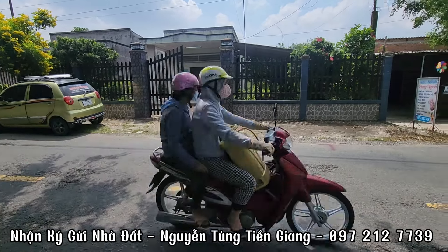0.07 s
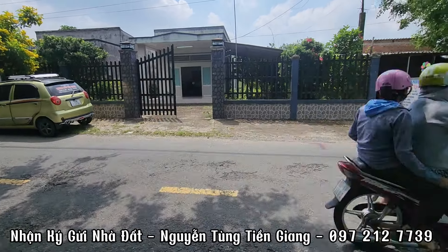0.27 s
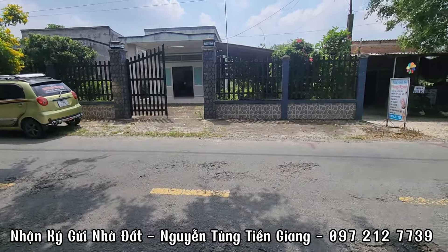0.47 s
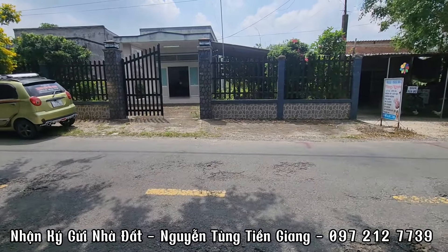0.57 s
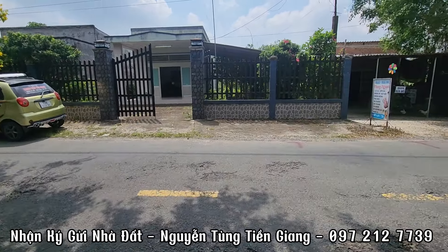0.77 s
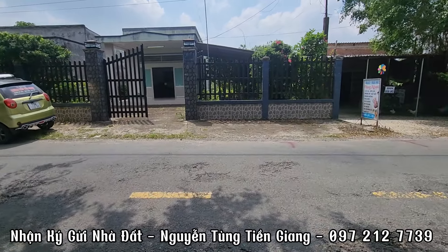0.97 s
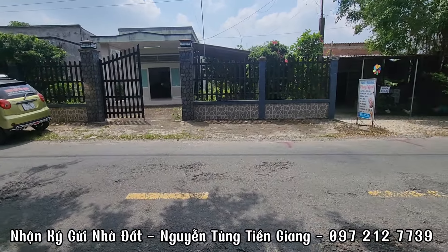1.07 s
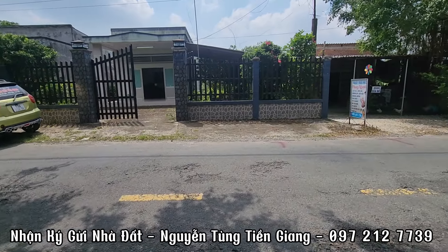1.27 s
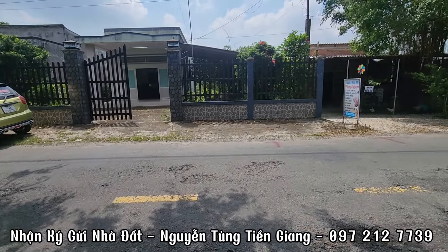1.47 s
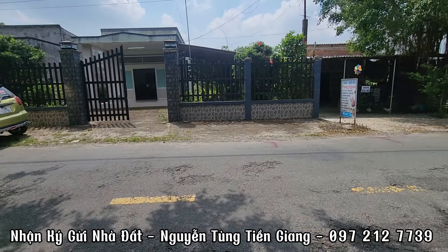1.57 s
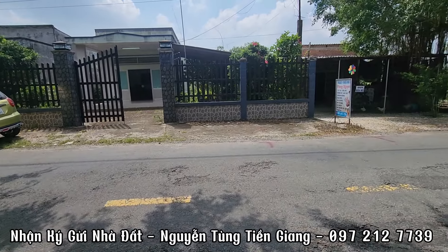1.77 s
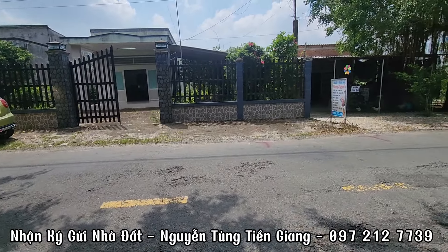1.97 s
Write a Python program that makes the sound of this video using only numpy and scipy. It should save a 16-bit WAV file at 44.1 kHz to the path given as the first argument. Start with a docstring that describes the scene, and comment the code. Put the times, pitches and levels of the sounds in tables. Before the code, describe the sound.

A small single-cylinder motorbike putters past close on a road, then rides away to the right

```python
"""Beside a road, a small single-cylinder motorbike passes close from the front to the right and rides away.
Each firing rings decaying resonances of silencer and pipe over bursts of gas rumble, with a nasal rasp.
Short bursts of bright noise are gas spitting from the tail; noise bands make tyre roar and chain hiss.
A pair of microphones hears the right side earlier and brighter."""
import sys
import numpy as np
from scipy import signal
from scipy.fft import rfft, irfft
from scipy.io import wavfile
from scipy.ndimage import map_coordinates

SR = 44100
rng = np.random.default_rng(int(sys.argv[2]) if len(sys.argv) > 2 else 0)


def gain_from_decibels(decibels):
    """Convert decibel values to linear amplitude factors."""
    exponent = np.asarray(decibels, float) / 20
    return 10 ** exponent


def digitize_waveform(pressure):
    """Quantize a signal to 16-bit integers and store it at the path in sys.argv[1].

    Rows of a 2-D input are taken as channels; values are limited to [-1, 1].
    """
    field = np.atleast_2d(pressure).T
    bounded = np.clip(field, -1, 1)
    quanta = np.round(bounded * 32767).astype(np.int16)
    wavfile.write(sys.argv[1], SR, quanta)


N = 88640  # length in samples


def rms_one(x):
    """Normalisation: equal mean power, scaling to unit rms."""
    return x / np.sqrt(np.mean(x ** 2) + 1e-20)


def in_time(rows, s=None):
    """Linear interpolation of a table's columns, at every sample or at times s."""
    t, *columns = np.transpose(rows)
    wanted = np.arange(N) / SR if s is None else s
    return [np.interp(wanted, t, column) for column in columns]


def at_hz(points, hz):
    """Interpolation of a spectrum on a logarithmic frequency axis."""
    point_hz, value = np.transpose(points)
    return np.interp(np.log(hz), np.log(point_hz), value)


def bin_hz():
    """Discrete Fourier transform: the frequencies of its bins."""
    return np.arange(N // 2 + 1) * SR / N


def drift(rate_hz):
    """Low-pass filtering: white noise through a double pole becomes a slow wander of unit rms."""
    step = 40  # samples between computed points
    pole = np.exp(-2 * np.pi * rate_hz * step / SR)
    white = rng.standard_normal(N // step + 2002)
    slow = signal.lfilter([1], [1, -2 * pole, pole * pole], white)[2000:]
    return np.interp(np.arange(N) / step, np.arange(len(slow)), rms_one(slow))


def colour(x, spectrum):
    """Linear filtering: multiplication in frequency shapes the spectrum of noise."""
    hz = np.maximum(bin_hz(), 1)
    return irfft(rfft(x) * gain_from_decibels(at_hz(spectrum, hz)), N)


def patchy_noise(spectrum, patchy_db, excite):
    """Amplitude modulation: half-octave bands of two unrelated noises flicker, partly together."""
    edges_hz = 25 * 2 ** np.arange(0, 9.6, .5)
    spec = rfft(rms_one(colour(excite, spectrum)))
    together = drift(11.3)
    hz, out = bin_hz(), 0
    for low, high in zip(edges_hz, edges_hz[1:]):
        band = irfft(spec * ((hz >= low) & (hz < high)), N)
        out = out + band * gain_from_decibels(patchy_db * (0.81 * together + drift(38.6)))
    return rms_one(out)


def firings():
    """Doppler effect: the firing rate sags as the bike turns from coming to going; timing is jittered."""
    # running count of firings: start_s, count
    firing_count = [(-.2, -5), (.0405, 1), (.1205, 3), (.2445, 6), (.538, 13), (.752, 18), (.926, 22),
                    (1.097, 26), (1.273, 30), (1.449, 34), (1.583, 37), (1.853, 43), (2.077, 48)]
    s, count = np.transpose(firing_count)
    chance = rng.standard_normal((53, 12))  # one row of chance for each firing
    timing_spread_s = .0006
    return np.interp(np.arange(-5, 48), count, s) + timing_spread_s * chance[:, 0], chance


def per_firing(s, shapes):
    """Superposition: one short shape is laid at each time and overlaps add."""
    pad, out = SR // 2, np.zeros(N + SR * 2)
    first = (s[:, None] * SR).astype(int) + pad
    np.add.at(out, first + np.arange(shapes.shape[1]), shapes)
    return out[pad:pad + N]


def resonance(t, hz, level_db, peak_s, swell, clock_s):
    """Damped resonance: a sine swells to its peak and dies, one row for each firing."""
    envelope = (t / peak_s * np.exp(1 - t / peak_s)) ** swell
    return gain_from_decibels(level_db)[:, None] * envelope * np.sin(2 * np.pi * hz[:, None] * clock_s)


def echoes(tone):
    """Reflection: road and walls return delayed, weaker copies."""
    # reflections: delay_s, level_db
    reflections = [(.007, -15), (0.017, -22)]
    out = tone
    for delay_s, db in reflections:
        lag = int(delay_s * SR)
        out = out + gain_from_decibels(db) * np.r_[np.zeros(lag), tone[:N - lag]]
    return out


def exhaust(s, chance):
    """Impulse excitation: each firing rings the pipes; gas noise bursts out and dies to a steady rumble."""
    # resonances and gas over time: start_s, boom_hz, boom_db, pipe_db, thud_db, gas_rumble_db
    exhaust_levels = [(0, 119, -11, -12.5, -3.5, -29), (.13, 122, -10, -11, -16, -50),
                      (.2, 105, -7.5, -19, -15, -30), (.25, 108.3, -9, -19, -3, -30.5),
                      (.3, 113.3, -6.5, -19, -16, -21.5), (.37, 114, -8.5, -16.5, -7.5, -21),
                      (.45, 117.3, -8, -19, -10, -21.5), (.55, 104, -8, -21, -7, -29),
                      (.7, 100, -11.5, -22, -9, -30.5), (.8, 101, -13.5, -28, -16.5, -33),
                      (1.1, 94, -15.5, -28, -14, -35), (1.4, 99, -19.5, -35, -24, -37.5),
                      (1.6, 95.8, -19, -36, -24.5, -39.5), (1.8, 102, -21.5, -37, -25, -38),
                      (1.9, 107, -19, -30, -25.5, -38), (2.01, 98, -23, -45, -25, -38.5)]
    # relative spectral density of the gas rumble: frequency_hz, level_db
    rumble_colour = [(30, -35), (60, -0.5), (130, 0.5), (200, -9), (305, -7), (385, -7), (600, -9),
                     (800, -18.5), (1000, -30), (1400, -32)]
    # nasal rasp of the engine's front side: start_s, level_db
    rasp_level = [(0, -32), (.15, -37.5), (.3, -34.5), (.45, -53), (.6, -61), (2.01, -64)]
    # relative spectral density of the rasp: frequency_hz, level_db
    rasp_colour = [(900, -18), (1200, -1.5), (1420, 4.5), (1700, -0.5), (2100, -27)]
    pitch_spread, strength_spread_db = .018, 1.1
    glide, glide_s = 0.29, 0.005  # the boom starts this share flat and rises to pitch
    gas_decay_s, gas_steady = 0.025, 0.76

    t = np.arange(SR // 8) / SR
    boom_hz, boom_db, pipe_db, thud_db, _ = in_time(exhaust_levels, s)
    gliding = t - glide * glide_s * (1 - np.exp(-t / glide_s))
    # pitch in Hz, level in dB, time of peak in s, sharpness of the swell, clock in s
    parts = [(boom_hz, boom_db, .0105, 1.2, gliding),
             (371.6, pipe_db, .0065, 1, t),  # pipe
             (440.6, pipe_db - 5, .0065, 1, t),  # upper pipe
             (165, thud_db, .0034, 2.6, t)]
    shapes = 0
    for k, (hz, db, peak_s, swell, clock_s) in enumerate(parts):
        varied_hz = hz * (1 + pitch_spread * chance[:, 1 + k])
        # one share of chance is common to all parts, the other is the part's own
        varied_db = db + strength_spread_db * (chance[:, 5] + chance[:, 6 + k])
        shapes = shapes + resonance(t, varied_hz, varied_db, peak_s, swell, clock_s)
    tone = echoes(per_firing(s, shapes))

    gate = gas_steady + per_firing(s, np.tile(np.exp(-t / gas_decay_s), (len(s), 1)))
    gas = patchy_noise(rumble_colour, patchy_db=1.5, excite=rng.standard_normal((2, N)))
    rasp = patchy_noise(rasp_colour, patchy_db=1.2, excite=rng.standard_normal((2, N)))
    noise = gain_from_decibels(in_time(exhaust_levels)[-1]) * gas + gain_from_decibels(in_time(rasp_level)[0]) * rasp
    return tone * [[1], [0]] + gate * noise  # the tone is wholly shared by both microphones


def spit(s, chance):
    """Jet noise: gas makes a short bright puff at each firing, with some extra spits and cracks added."""
    # puffs at the firings: start_s, level_db
    spit_level = [(0, -47), (.3, -44), (.5, -28), (.63, -22), (.76, -24.5), (.82, -35), (.97, -30.5),
                  (1.03, -26.5), (1.2, -42), (1.28, -40.5), (1.45, -31.5), (1.62, -41.5), (2.01, -80)]
    # extra spits and cracks: start_s, level_db
    extra_spits = [(0.395, -14), (0.584, -27), (.667, -27), (0.714, -25), (0.928, -31.5), (1.059, -32),
                   (1.097, -29), (1.143, -31), (1.188, -30.5), (1.318, -32.5), (1.381, -33), (1.402, -39),
                   (1.492, -46)]
    # relative spectral density: frequency_hz, level_db
    spit_colour = [(800, -4), (2000, 2), (3000, -6), (5000, 4), (7500, -2.5), (10000, -7.5), (13000, -9),
                   (16000, -20), (16500, -50)]
    delay_s, rise_s, decay_s, spread_db = .002, .001, .0028, 1.8
    t = np.arange(SR // 20) / SR
    puff = (1 - np.exp(-t / rise_s)) * np.exp(-t / decay_s)
    extra_s, extra_db = np.transpose(extra_spits)
    usual_db = in_time(spit_level, s)[0] + spread_db * chance[:, 10]
    size = gain_from_decibels(np.r_[usual_db, extra_db])[:, None]
    gate = per_firing(np.r_[s + delay_s, extra_s], size * puff)
    return gate * patchy_noise(spit_colour, patchy_db=2.0, excite=rng.standard_normal((2, N)))


def rolling():
    """Random excitation: filtered noise is tyre roar; noise with sparse grit impulses is a bright swish."""
    # levels over time: start_s, tyre_db, swish_db
    rolling_levels = [(0, -41, -36), (.12, -32, -32.5), (.25, -32.5, -35), (.3, -27.5, -29),
                      (.37, -26, -29), (.39, -33, -29.5), (.425, -22.5, -21), (.47, -25, -28),
                      (.53, -29, -30), (.57, -36, -38), (.7, -34, -39.5), (.82, -40.5, -43.5),
                      (1.3, -44.5, -49.5), (1.4, -41, -46), (1.5, -43.5, -49), (1.7, -44.5, -52.5),
                      (2.01, -44.5, -54)]
    # relative spectral density of the tyre roar: frequency_hz, level_db
    tyre_colour = [(500, -7), (900, -1.5), (1300, -0.5), (1800, -2.5), (2300, -6.5), (2800, -23.5),
                   (4000, -44)]
    # relative spectral density of the swish: frequency_hz, level_db
    swish_colour = [(1500, -1), (2200, -2.5), (3200, 1.5), (5600, -3.5), (7300, -6.5), (10300, -18),
                    (11900, -8), (14700, -13), (16000, -29), (16500, -60)]
    grit_per_s, grit_spread_db, grit_db = 1300, 10, -12
    tyre_db, swish_db = in_time(rolling_levels)
    struck = rng.random((2, N)) < grit_per_s / SR
    grit = struck * gain_from_decibels(grit_spread_db * np.minimum(rng.exponential(1, (2, N)), 4))
    crackle = rms_one(grit * rng.choice([-1, 1], (2, N)))
    excite = rng.standard_normal((2, N)) + gain_from_decibels(grit_db) * crackle
    roar = patchy_noise(tyre_colour, patchy_db=1.0, excite=rng.standard_normal((2, N)))
    swish = patchy_noise(swish_colour, patchy_db=1.5, excite=excite)
    return gain_from_decibels(tyre_db) * roar + gain_from_decibels(swish_db) * swish


def top_treble(x):
    """High-shelf filtering: the top treble is strongest close by and duller from afar."""
    # gain of the top treble: start_s, level_db
    top_level = [(0, -2.5), (.22, -3.5), (.3, -3), (.5, -2), (.8, -4.5), (1.4, -3), (1.6, -4.5),
                 (2.01, -10)]
    from_hz = 9350
    top = irfft(rfft(x) * (bin_hz() > from_hz), N)
    return x + (gain_from_decibels(in_time(top_level)[0]) - 1) * top


def microphones(x):
    """Interaural differences: as the bike moves to the side, the left hears it late and shadowed."""
    # left minus right for a source at the side: frequency_hz, level_db
    shadow = [(100, 1), (300, -2.4), (650, 2), (1300, -4), (2500, -3), (5000, -17), (9000, -6.5),
              (15000, -7.5)]
    # likeness of left and right: frequency_hz, correlation
    likeness = [(60, 0.96), (300, 0.88), (700, 0.84), (1500, 0.38), (4000, 0.17), (12000, 0.22)]
    ahead_s, turn_s, full_lag_s = 0.058, 0.5, 0.000541  # turn_s after ahead_s the bike is at 45 degrees
    n, hz = np.arange(N), np.maximum(bin_hz(), 1)
    side = np.sin(np.arctan((n / SR - ahead_s) / turn_s))  # 0 ahead, 1 fully right
    # x holds a shared sound and an unrelated twin, which enters with opposite signs
    alike = np.clip(at_hz(likeness, hz), 0, 1)
    shared, twin = rfft(x)
    pair = np.sqrt((1 + alike) / 2) * shared + np.sqrt((1 - alike) / 2) * twin * [[1], [-1]]
    shade = gain_from_decibels(at_hz(shadow, hz) / 2)
    front = irfft(pair, N)
    beside = irfft(pair * [shade, 1 / shade], N)
    left, right = front + np.clip(side, 0, 1) * (beside - front)
    late_left = map_coordinates(left, [n - side * full_lag_s * SR], order=3, mode="nearest")
    return np.array([late_left, right])


def scene():
    """Superposition: exhaust, spit and rolling noise add and reach the pair of microphones."""
    s, chance = firings()
    bike = exhaust(s, chance) + spit(s, chance) + rolling()
    return microphones(top_treble(bike))


def band_limit(x):
    """A steep low-pass at the top of the band."""
    return signal.sosfilt(signal.butter(12, 16650, fs=SR, output="sos"), x)


def record(dry):
    """High-pass filtering and saturation: the bass rolls off and peaks meet a soft ceiling."""
    high_pass = signal.butter(4, 42.0, "high", fs=SR, output="sos")
    x = signal.sosfilt(high_pass, dry)
    mix = 1.518 * np.tanh(x / 1.53)
    return band_limit(mix)


dry = scene()
out = record(dry)
digitize_waveform(out)
```